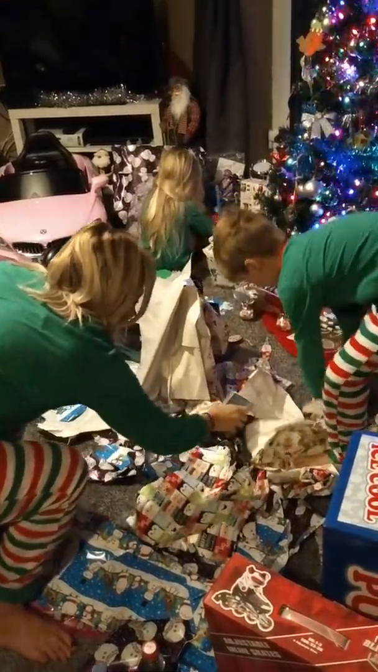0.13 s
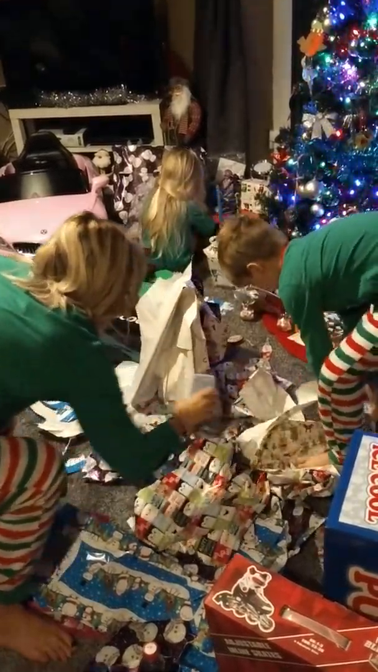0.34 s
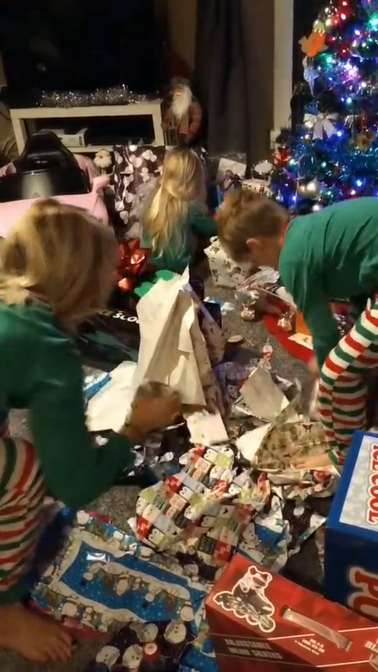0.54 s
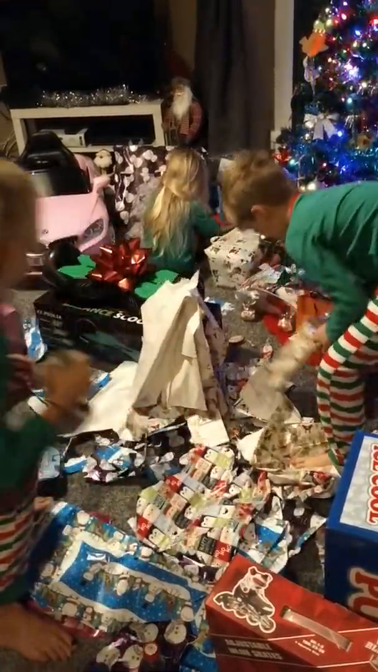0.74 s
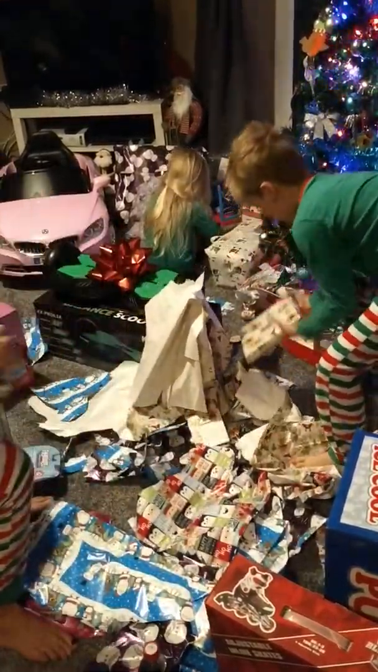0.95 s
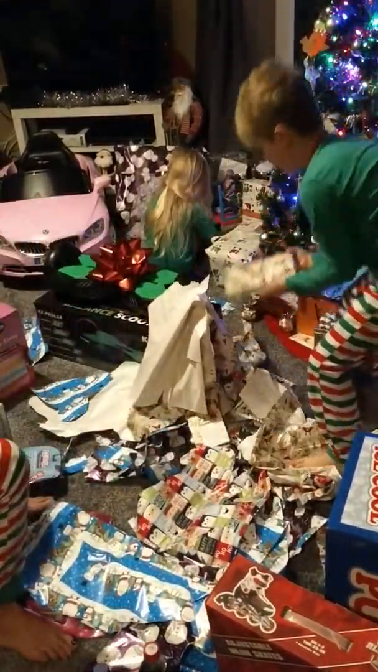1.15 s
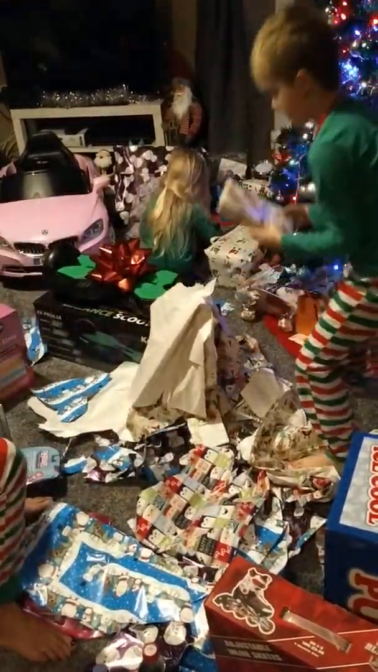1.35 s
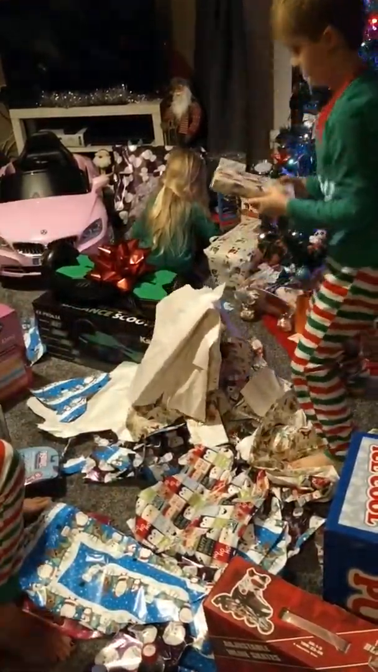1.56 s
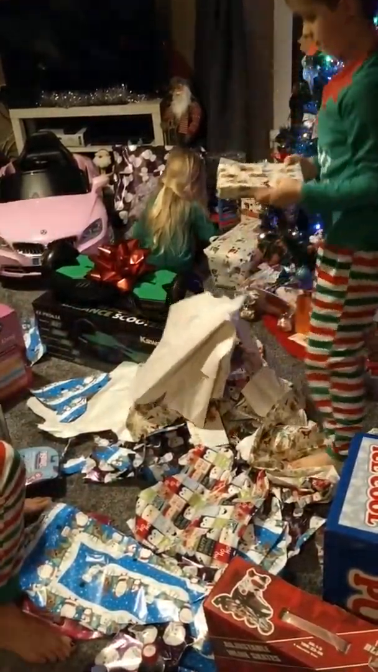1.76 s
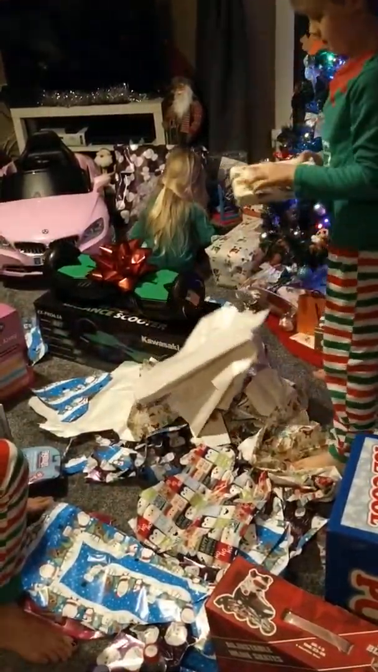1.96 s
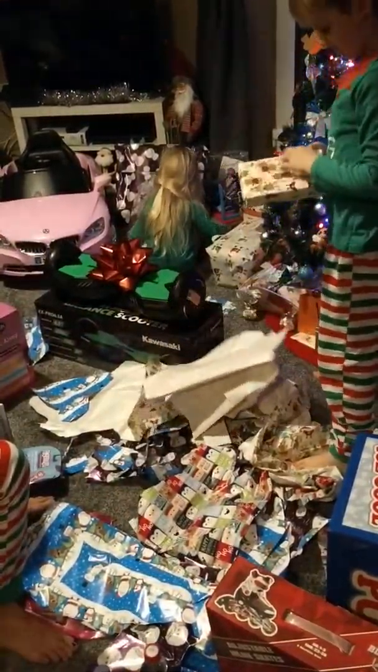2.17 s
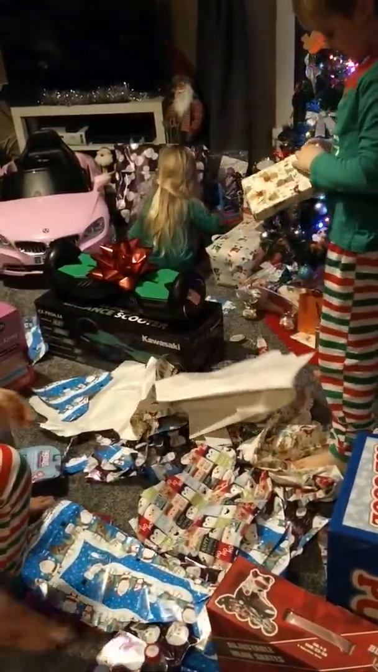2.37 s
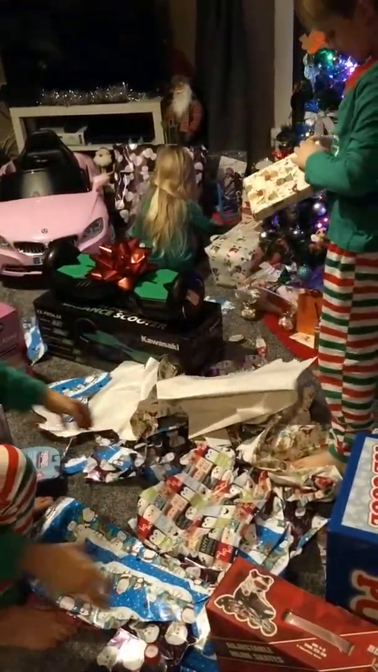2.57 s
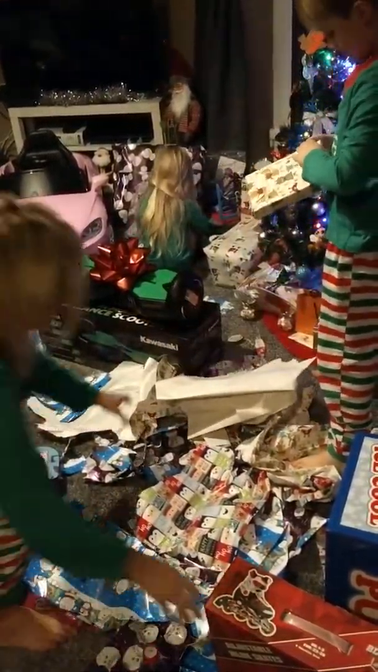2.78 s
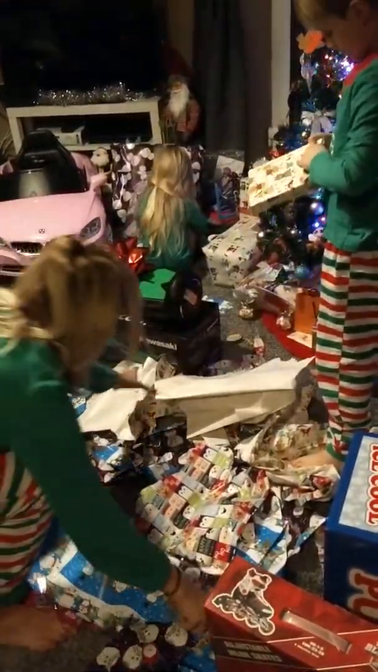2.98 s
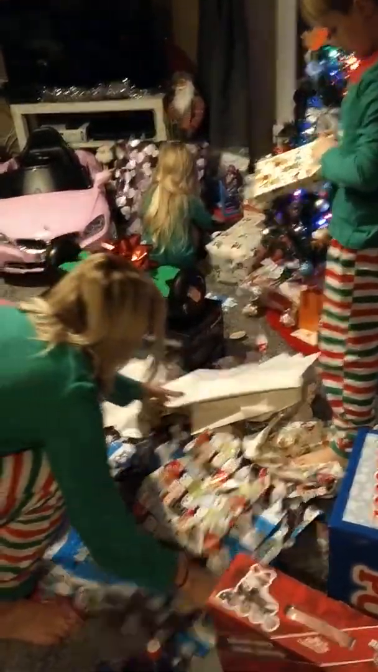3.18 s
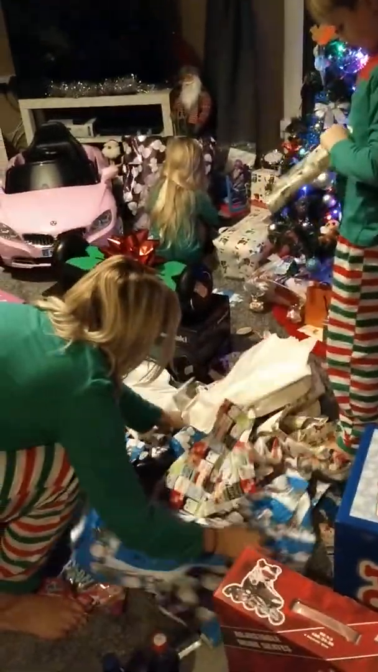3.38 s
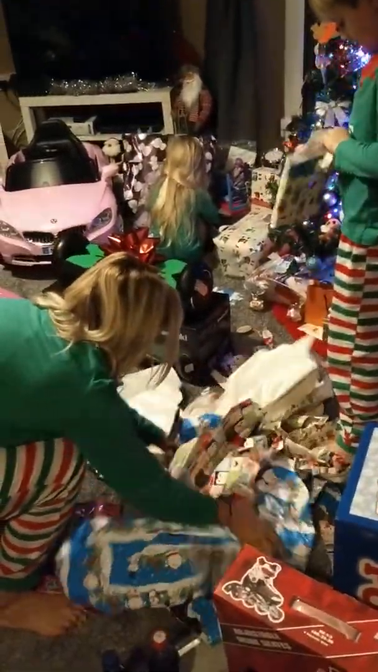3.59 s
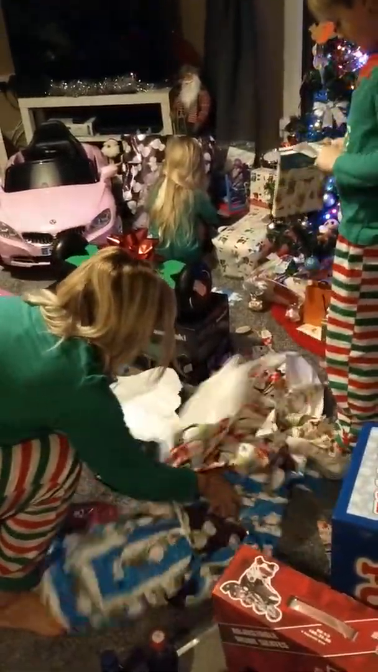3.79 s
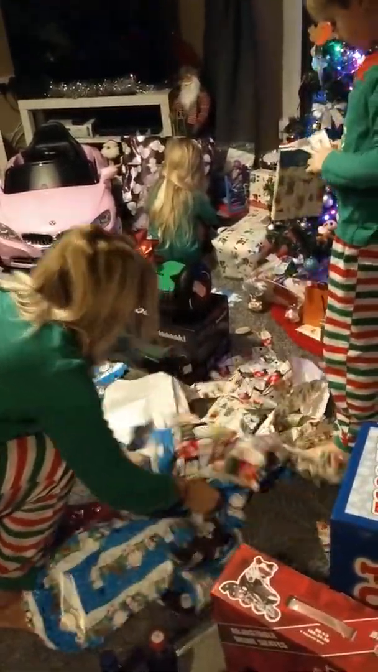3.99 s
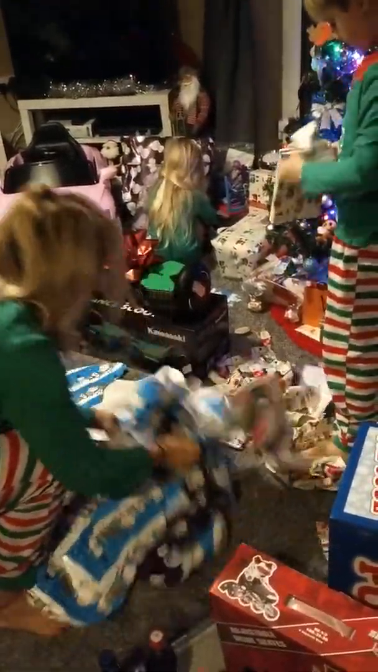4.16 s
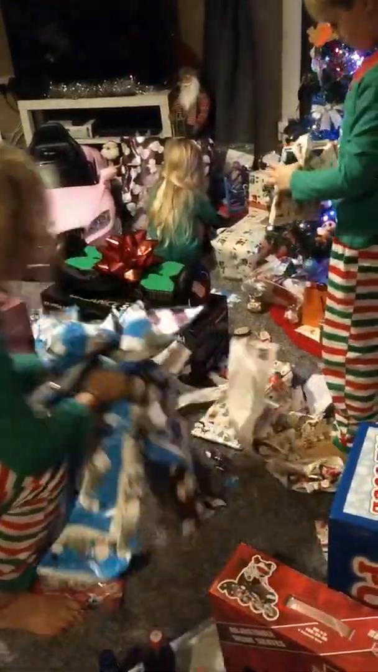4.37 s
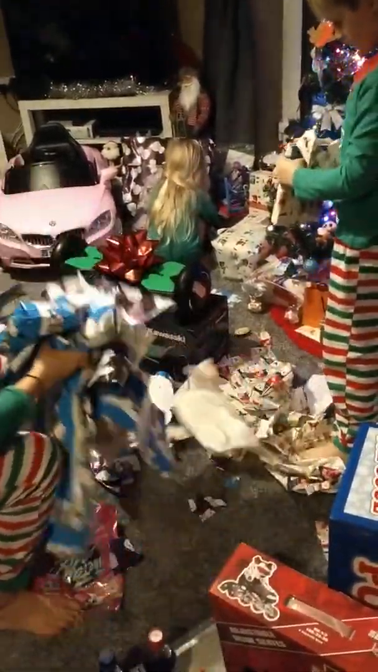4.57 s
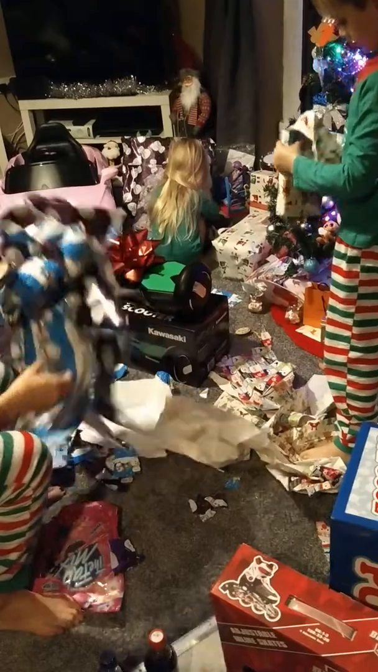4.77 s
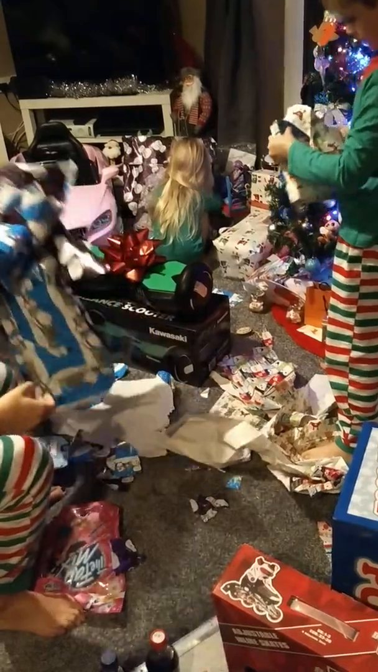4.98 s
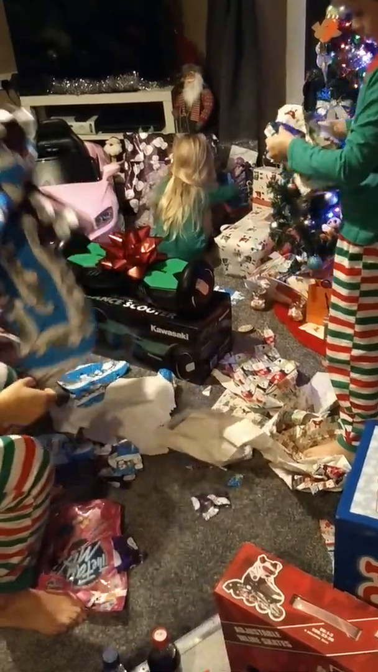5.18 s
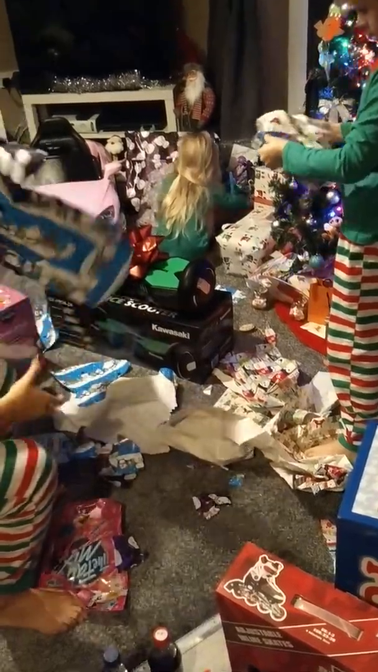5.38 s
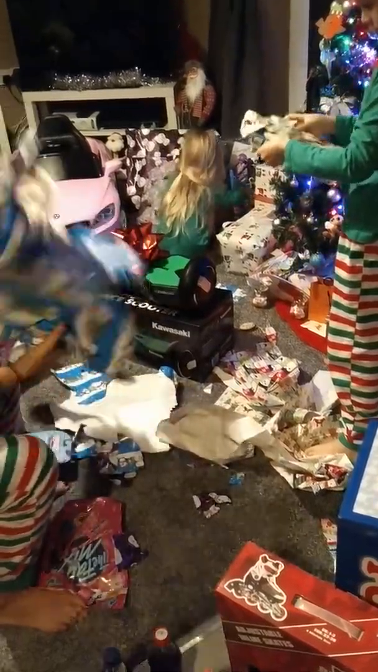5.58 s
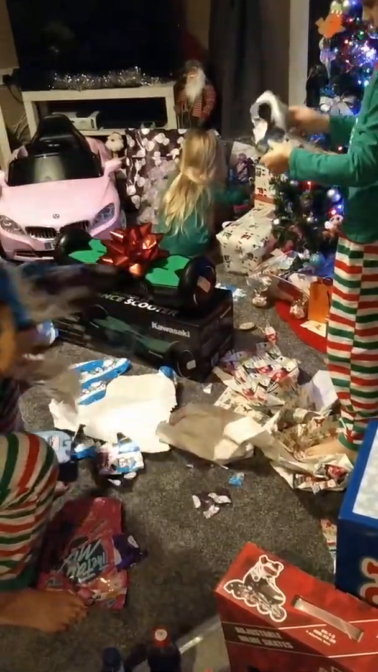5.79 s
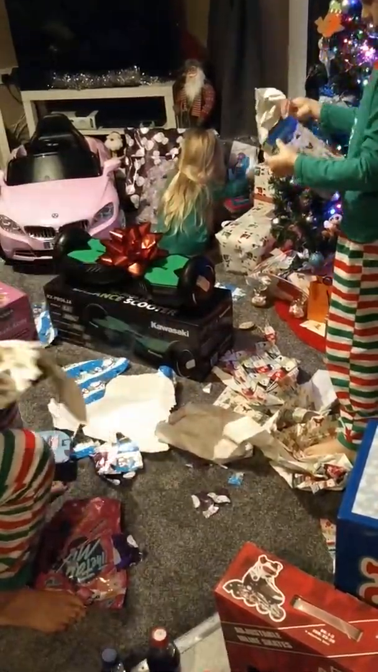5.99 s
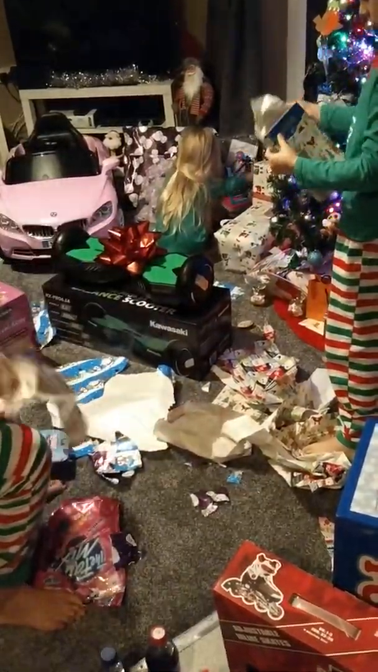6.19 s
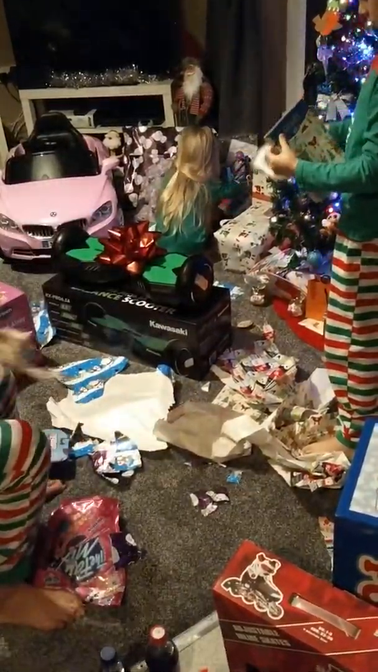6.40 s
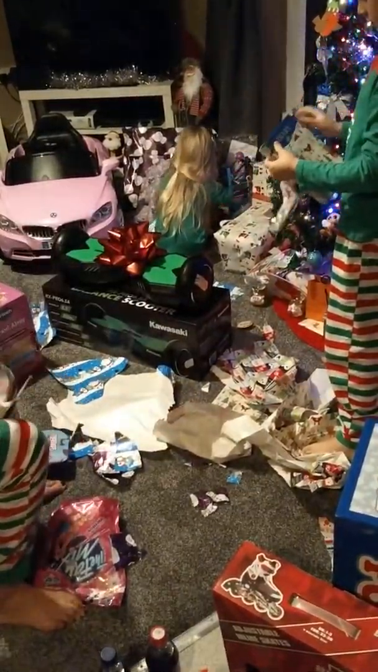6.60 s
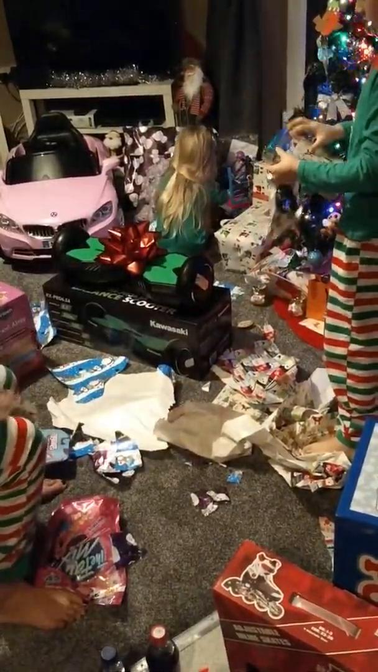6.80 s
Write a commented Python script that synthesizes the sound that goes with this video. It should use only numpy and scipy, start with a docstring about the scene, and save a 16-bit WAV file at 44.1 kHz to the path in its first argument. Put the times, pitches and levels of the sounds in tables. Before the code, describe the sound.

Quiet paper rustling and faint cardboard rubbing open the scene, followed by several dry rips, a boxy knock and a soft thud. After a near pause, heaps of stiff wrapping paper are gathered and crumpled vigorously, with sharp ticks, flapping sheets and further tears. Close phone pickup, short dry indoor ambience, faint low hum underneath.

```python
"""A carpeted living room, close to a phone: wrapping paper is gathered, crumpled and torn.
Countless creases buckle and fibres snap as random clicks, shaped in pitch and level by the hands.
Flapping sheets are low noise from the same clicks, stiff folds are short noise bursts, and rubbed cardboard
is slip impulses through a resonance; knocked boxes and the thudding floor ring in decaying modes.
A faint hum lies underneath; the phone widens its two microphones by cancelling each against the other."""
import sys
import numpy as np
from scipy import signal
from scipy.fft import rfft, irfft, next_fast_len
from scipy.io import wavfile
from scipy.ndimage import uniform_filter1d

SR = 44100
rng = np.random.default_rng(int(sys.argv[2]) if len(sys.argv) > 2 else 0)


def inscribe(sig):
    """Save sig as 16-bit PCM at rate SR to the path in sys.argv[1].

    A 1-D sig is mono; a 2-D sig holds one channel per row.
    Samples are clipped to [-1, 1] before scaling.
    """
    pcm = np.round(np.clip(np.atleast_2d(sig).T, -1, 1) * 32767)
    wavfile.write(sys.argv[1], SR, pcm.astype(np.int16))


N = 302040
TIME = np.arange(N) / SR
SIZE = next_fast_len(N + SR // 2)  # transform length, with space for the room's tail
FREQ = np.arange(SIZE // 2 + 1) * SR / SIZE + 1e-3  # Hz, kept off zero for the logarithms


def undb(db):
    """Decibels to gain."""
    return 10 ** (np.asarray(db) / 20)


def unit(x):
    """Scale to rms 1."""
    return x / np.sqrt(np.mean(np.abs(x) ** 2))


def colour(points):
    """Gain at every frequency, drawn through (Hz, dB) points on a logarithmic pitch axis."""
    hz, db = np.transpose(points)
    return undb(np.interp(np.log(FREQ), np.log(hz), db))


def lifts(modes):
    """Response of a few resonances standing on a flat spectrum."""
    return 1 + sum((undb(db) - 1) / (1 + 2j * (FREQ - hz) / width) for hz, width, db in modes)


def shape(x, response):
    """Filter by a frequency response."""
    return irfft(rfft(x, SIZE) * response, SIZE)[..., :N]


MIC_SPACING_S = .0004  # travel time between the two microphones


def diffuse(pair):
    """Spectra at two microphones of sound from all sides: alike in the bass, unrelated in the treble."""
    likeness = np.sinc(2 * FREQ * MIC_SPACING_S)
    mid, side = rfft(pair, SIZE) * np.sqrt([(1 + likeness) / 2, (1 - likeness) / 2])
    return np.array([mid + side, mid - side])


def room(wet_db, t60, treble_t60, lag=0):
    """Response of the room: direct sound, lag s later on the right, and a tail whose treble dies first."""
    t = np.arange(SR // 2) / SR
    echoes = rng.standard_normal((2, len(t))) * (t > .002)
    low = diffuse(echoes * undb(-60 * t / t60))
    high = diffuse(echoes * undb(-60 * t / treble_t60))
    bright = FREQ ** 2 / (FREQ ** 2 + 6000 ** 2)
    tail = unit(low * (1 - bright) + high * bright)
    direct = np.exp(1j * np.pi * lag * np.outer([1, -1], FREQ))
    return direct + undb(wet_db) * tail


# The still air's colour. Each row: frequency in Hz, relative density in dB.
AIR_COLOUR = [(30, 26.5), (55, 20), (90, 15), (160, 15.5), (320, 13), (480, 1), (800, 5.5), (2000, -2),
              (6000, -9), (15000, -9)]
# The steady hum's partials. Each row: frequency in Hz, rms level in dB ahead of the microphones.
HUM_PARTIALS = [(100, -60), (140, -54.5), (301, -59.5)]
STILL_AIR_DB = -49  # rms


def background():
    """Still air is coloured noise from all sides; the faint hum is a few sines, the same on both sides."""
    noise = diffuse(rng.standard_normal((2, N)))
    air = irfft(noise * colour(AIR_COLOUR), SIZE)[:, :N]
    hum = 0
    for hz, db in HUM_PARTIALS:
        hum = hum + undb(db) * unit(np.sin(2 * np.pi * (hz * TIME + rng.random())))
    return undb(STILL_AIR_DB) * unit(air) + hum


def strokes(events):
    """Power of body, crackle and sizzle: each stroke swells, holds while the hand moves, then dies away."""
    power = np.zeros((3, N))
    for start, swell, hold, t60, db, body_db, sizzle_db in events:
        during = slice(max(int(start * SR), 0), int((start + swell + hold + t60) * SR))
        t = TIME[during] - start
        dying = undb(-60 * np.clip((t - swell - hold) / t60, 0, 2))
        envelope = np.clip(t / swell, 0, 1) * dying
        power[:, during] += np.outer(undb([db + body_db, db, db + sizzle_db]), envelope) ** 2
    return power


# Handfuls grabbed and crushed. Each row: start in seconds, swell in seconds, hold in seconds,
# time to fall 60 dB in seconds, crackle level in dB, body and sizzle relative to it in dB.
GRAB_STROKES = [(0.0, 0.028, 0.015, 0.9, -51.5, 10, -23), (.24, 0.056, 0.034, 0.29, -36.5, 4, -11.5),
                (.465, 0.024, .046, 0.45, -41, 1.5, -7.5), (1.11, 0.04, 0.013, 0.1, -42, 8, -15),
                (2.56, .013, .023, 0.37, -44, 1, -18), (2.63, .016, 0.059, 0.3, -48.5, -10, -1),
                (2.755, 0.014, 0.031, 0.5, -52.5, 3.5, -16), (3.0, .013, 0.083, 0.2, -32.5, -6.5, -23),
                (3.055, 0.0071, 0.084, 0.34, -32, -3, -9.5), (3.26, 0.097, 0.14, 0.2, -30, -5.5, -11.5),
                (3.61, .14, 0.029, 0.4, -27, -1, -7.5), (3.84, 0.059, 0.12, 0, -35.5, 0, -22),
                (4.2, .04, 0.012, 0.6, -31, -3, -22), (4.275, 0.036, 0.022, 0.25, -27.5, -2.5, -11),
                (4.39, 0.035, 0.019, 0.22, -26, -5, -10), (4.8, .02, 0.025, 1.1, -37.5, -15, -8),
                (5.44, .026, 0.046, 0.2, -39.5, -2.5, -5), (5.615, 0.0074, 0.056, 0.46, -26, -8, -15.5),
                (5.69, 0.031, 0.049, 0.34, -26, -5, -12), (5.83, 0.099, 0.032, 0.5, -36, 3.5, -3),
                (6.02, .027, 0.082, 0.5, -46, 9.5, 1.5), (6.16, 0.021, 0.11, 0.3, -40, 6.5, -9),
                (6.31, 0.086, 0.035, 0.25, -29.5, -0.5, -10.5), (6.65, 0.083, 0.043, 0.5, -35.5, -1, -7.5)]


def grabs():
    """Power of the crushing: a hand closes on the paper, squeezes and lets it settle."""
    return strokes(GRAB_STROKES)


# The loose heap shifting on the carpet. Each row: time in seconds, crackle level in dB.
HEAP_LEVEL = [(0, -46), (.43, -48), (.56, -42.5), (1.1, -39), (1.65, -51.5), (2.0, -46), (2.3, -50.5),
              (2.75, -53.5), (3.2, -35.5), (3.9, -32), (4.75, -37.5), (4.93, -36.5), (5.25, -39),
              (5.39, -46.5), (5.6, -39.5), (5.85, -32.5), (6.5, -37), (6.85, -38.5)]
HEAP_BODY_DB, HEAP_SIZZLE_DB = -5, -12.5  # relative to its crackle


def heap():
    """Power of the heap's rustle, gliding in level from point to point with a fixed brightness."""
    level = undb(np.interp(TIME, *np.transpose(HEAP_LEVEL)))
    return np.outer(undb([HEAP_BODY_DB, 0, HEAP_SIZZLE_DB]), level) ** 2


# Whole sheets swung through the air. Each row: middle in seconds, length in seconds, flap level in dB.
SHEET_SWINGS = [(0.03, 0.11, -47.5), (1.025, 0.077, -45.5), (1.363, 0.55, -51.5), (4.26, 0.19, -45),
                (5.02, 0.14, -50), (5.455, 0.031, -48), (5.715, 0.16, -47), (6.39, 0.092, -40.5),
                (6.763, 0.12, -42)]
# air pushed by the paper: dB at the reference body level, then dB gained per dB of body
AIR_DB, AIR_SLOPE, BODY_REFERENCE_DB = -48.5, 0.68, -35


def flap(body_db):
    """Power of the flap: pushed air follows the paper's body, and each swing adds a smooth swell."""
    power = undb(AIR_DB + AIR_SLOPE * (body_db - BODY_REFERENCE_DB)) ** 2
    for middle, length, db in SHEET_SWINGS:
        power = power + undb(db) ** 2 * np.exp(-(2 * (TIME - middle) / length) ** 2)
    return power


# Rips through the paper. Each row: start in seconds, swell in seconds, hold in seconds,
# time to fall 60 dB in seconds, crackle level in dB, body and sizzle relative to it in dB,
# share from the side (0-1).
RIP_STROKES = [(0.829, 0.15, .019, 0.37, -31, -12, -8, 0.84), (.86, .02, .03, 1, -41, -12, -14, .95),
               (1.10, 0.07, 0.25, 0.5, -31, -12, -7.5, 0.89),
               (1.34, 0.099, 0.075, 0.33, -29.5, -9.5, -5.5, 0.86),
               (1.698, 0.022, 0.26, 0.33, -36.5, -7.5, -10, .7),
               (1.817, 0.073, 0.02, 0.24, -25.5, -4.5, -9, .5),
               (2.781, 0.013, 0.094, .02, -36.5, -17, -2, .8),
               (2.84, .055, .043, .31, -31, -10.5, -5, 0.76),
               (3.48, 0.035, 0.066, 0.34, -25.5, -9, -6.5, .5),
               (4.948, .058, 0.053, 0.36, -29, -25, -14.5, 0.74),
               (5.12, 0.037, 0.047, .29, -22.5, -10, -12, .1), (5.897, .03, .04, 0.5, -35, -10, -6, .9)]


def rips():
    """Power of the tearing, and the part of its crackle that comes from the present off to the side."""
    power, aside = 0, 0
    for *stroke, side_share in RIP_STROKES:
        rip = strokes([stroke])
        power = power + rip
        aside = aside + side_share * rip[1]
    return power, aside


RIP_FIBRES_DB, GRAB_FIBRES_DB = 4, -2  # fibres against creases, before the crowds' own trims


def handling():
    """Levels (dB) of flap, body, crackle and sizzle, fibres against creases (dB), and share from the side."""
    ripping, aside = rips()
    power = ripping + grabs() + heap()
    body, crackle, sizzle = 10 * np.log10(power)
    tearing = GRAB_FIBRES_DB + (RIP_FIBRES_DB - GRAB_FIBRES_DB) * ripping[1] / power[1]
    levels_db = np.array([10 * np.log10(flap(body)), body, crackle, sizzle])
    return levels_db, tearing, aside / power[1] + 1e-12


def creases(rate, spread_db, clump_db, share_db):
    """Sample, size and pitch of tiny bucklings per second; clumping swells their size in avalanches."""
    count = int(rate * N / SR)
    avalanche = unit(uniform_filter1d(rng.standard_normal(N), SR // 150))
    at = rng.integers(0, N, count)
    outlier = np.minimum(rng.exponential(size=count), 4)  # a few far louder than the rest
    size = undb(spread_db * outlier + clump_db * avalanche[at])
    size = unit(size) / np.sqrt(rate) * undb(share_db[at])
    pitch = 3000 * 2 ** (1.5 * rng.standard_normal(count))
    return at, size, pitch


SCATTER_S = .0005  # mean delay: each pitch of a buckling leaves the sheet at its own moment


def scattered(at, size):
    """A train of clicks, each a little late and of either sign."""
    late = (rng.exponential(SCATTER_S, len(at)) * SR).astype(int)
    return np.bincount(at + late, size * rng.choice([-1, 1], len(at)), N)[:N]


# Flap, body, crackle and sizzle, in that order. Each row: low edge in Hz, high edge in Hz.
PAPER_RANGES = [(150, 450), (700, 2000), (2400, 7000), (9400, 15500)]
# Colour of the paper. Each row: frequency in Hz, gain in dB.
PAPER_COLOUR = [(90, -13), (160, 0.5), (300, 0.5), (550, -1), (900, -3), (1300, -4.5), (2000, -2.5),
                (2550, -4.5), (3200, -2), (3900, -3), (5000, -3), (6000, -0.5), (9000, -1.64), (12000, 0),
                (15500, -2.5)]
# Standing waves of the room. Each row: frequency in Hz, width in Hz, lift in dB (negative dips).
ROOM_WAVES = [(179, 13, 5), (210, 11, 2), (292, 48, 4.5), (344, 37, 6.5), (482, 85, -5.5)]


def rustle(places, width_octaves=2.03, steady_s=0.085):
    """Creases and fibres each sound a broad range round their pitch; the hands set level and brightness."""
    levels_db, tearing, aside = handling()
    density_db = levels_db - 10 * np.log10(np.diff(PAPER_RANGES))
    log_centres = np.log(PAPER_RANGES).mean(axis=1)
    ahead_db, aside_db = 10 * np.log10([1 - aside, aside])
    # ahead: three places of sparse creases, three of dense fibres; the last place is off to the side
    crowds = [creases(rate=170, spread_db=2.2, clump_db=2.0, share_db=ahead_db - tearing / 2)
              for _ in range(3)]
    crowds += [creases(rate=1800, spread_db=3.2, clump_db=0.0, share_db=ahead_db + tearing / 2 - 1)
               for _ in range(3)]
    crowds += [creases(rate=3600, spread_db=3.0, clump_db=0.8, share_db=aside_db + 7)]
    paper = colour(PAPER_COLOUR) * lifts(ROOM_WAVES)
    out = 0
    for hz in 1000 * 2 ** (np.arange(-7, 9) / 2):  # overlapping half-octave steps
        band = np.cos(np.pi / 2 * np.clip(2 * np.log2(FREQ / hz), -1, 1))
        clicks = []
        for at, size, pitch in crowds:
            nearness = 1 / (1 + (np.log2(pitch / hz) / width_octaves) ** 2)
            clicks.append(scattered(at, size * nearness))
        clicks = np.array(clicks)
        # the hands feed in energy steadily, so a big snap relieves its neighbours
        energy = uniform_filter1d(np.sum(clicks ** 2, axis=0), int(steady_s * SR))
        clicks = clicks / np.sqrt(np.abs(energy) + 1e-15)
        heard = sum(rfft(train, SIZE) * walls for train, walls in zip(clicks, places))
        # crossfade between the levels of the two nearest ranges
        weights = np.array([np.interp(np.log(hz), log_centres, row) for row in np.eye(len(PAPER_RANGES))])
        out = out + irfft(heard * band * paper, SIZE)[:, :N] * undb(weights @ density_db)
    return out * np.sqrt(SR / 2)


# Hollow packages rubbed by hands and carpet. Each row: middle in seconds, length in seconds,
# level in dB ahead of the overall trim, resonance in Hz.
PACKAGE_RUBS = [(0.06, 0.062, -41.5, 738), (0.526, 0.074, -48, 867), (0.814, 0.09, -42, 296),
                (0.99, .12, -45.5, 334), (1.11, 0.16, -47, 819), (1.254, 0.12, -44.5, 198),
                (4.992, 0.32, -44, 333), (5.82, 0.16, -45, 175), (6.22, 0.34, -41.5, 588)]


def rubs(walls, slips_per_s=400, damping=.2, gain_db=-1):
    """Cardboard sticks and slips, and the hollow package hums at its own resonance."""
    out = 0
    for middle, length, db, hz in PACKAGE_RUBS:
        slips = rng.standard_normal(N) * (rng.random(N) < slips_per_s / SR)
        resonance = 1 / (1 + 2j * (FREQ - hz) / (damping * hz)) ** 2
        hollow = unit(shape(slips, resonance))
        out = out + undb(db + gain_db) * hollow * np.exp(-2 * ((TIME - middle) / length) ** 2)
    return shape(out, walls)


# Single creases that snap through. Each row: start in seconds, peak of the crack in dB ahead of the room,
# pitch in Hz, bright tick relative to the crack in dB.
CREASE_SNAPS = [(0.156, -29.5, 4500, -4), (0.468, -32, 1300, -8), (0.486, -25, 2360, -10),
                (0.736, -36, 3300, -10), (1.911, -17, 3500, -8), (2.447, -31, 2630, -7),
                (2.642, -39, 4500, -6), (2.689, -31, 5630, -10), (2.767, -37, 1660, -14),
                (2.783, -29, 4000, 5.5), (2.838, -20, 4470, 1), (3.004, -20, 2200, -10),
                (3.062, -21, 2200, -7), (3.0655, -22.5, 6000, 2), (3.3413, -24, 5000, -1.5),
                (3.496, -20, 3380, -12), (3.54, -15.5, 3600, -8), (3.757, -17.5, 1500, -12),
                (3.773, -22, 3400, -10), (3.839, -23, 3860, -3), (4.145, -22.5, 2940, -12),
                (4.2857, -24, 4000, -3), (4.2991, -21, 5000, -3), (4.31, -18, 1900, -12),
                (4.325, -18, 3400, -8), (4.334, -19, 3000, -8), (4.4246, -21, 5000, -4),
                (4.456, -17, 6500, 3), (4.8, -30, 1360, -14), (4.818, -26, 4000, -3),
                (5.003, -23, 5500, -3.5), (5.129, -20, 5500, -4), (5.152, -16, 3140, -4),
                (5.3272, -20.5, 3500, 2), (5.42, -34, 3390, -10), (5.474, -23, 5900, -7),
                (5.526, -25, 4000, -12), (5.577, -18.5, 3600, -6), (5.622, -14, 3860, -10),
                (5.658, -16, 3700, -12), (5.697, -14, 2200, -4), (5.73, -13.5, 3730, -6),
                (5.889, -20, 3700, -6), (5.925, -21, 5500, -4), (6.1913, -27, 5000, -4.5),
                (6.202, -20, 3300, -5), (6.247, -18, 3400, -7), (6.3225, -26, 1090, 2),
                (6.404, -18, 1300, -16), (6.44, -16.5, 1700, -8), (6.507, -19.5, 5000, -10),
                (6.662, -25, 3900, -8), (6.748, -23, 1600, -12)]
TICK_S, CRACK_S, SHIVER_T60_S = .0006, .0016, .04  # two time constants, then time to fall 60 dB


def snaps(walls, crack_db=8, width_octaves=0.9, tick_hz=12000):
    """A stiff fold gives way: a bright tick, a crack, then a short shiver of the sheet around it."""
    out = np.zeros(N + SR)
    t = np.arange(SR // 10) / SR
    hz = np.fft.rfftfreq(len(t), 1 / SR) + 1
    tick = np.exp(-t / TICK_S)
    crack = undb(-60 * t / SHIVER_T60_S) + undb(crack_db) * np.exp(-t / CRACK_S)
    for s, db, pitch, tick_db in CREASE_SNAPS:
        start = int(s * SR)
        for centre, envelope, peak_db in (pitch, crack, db), (tick_hz, tick, db + tick_db):
            tone = 1 / (1 + (np.log2(hz / centre) / width_octaves) ** 2)
            burst = irfft(rfft(rng.standard_normal(len(t))) * tone, len(t)) * envelope
            out[start:start + len(t)] += undb(peak_db) * burst / np.abs(burst).max()
    return shape(out, walls)


SPOT_DB, SPOT_OCTAVES = 6, 0.37  # lift of the modes near the struck spot's pitch, and its reach
SCUFF_DB = -8  # scuffing noise's starting level, against the modes' reference level
RADIATION_HZ = 116  # below this a struck body moves little air


def blows(events, modes, walls, gain_db, scuff_t60, scuff_hz):
    """Blows ring and scuff a body; each spot favours some modes, a longer contact leaves only low ones."""
    out = np.zeros(N + SR)
    t = np.arange(SR // 2) / SR
    rings = np.array([undb(db - 60 * t / t60) * np.cos(2 * np.pi * hz * t) for hz, db, t60 in modes])
    mode_hz = np.array(modes)[:, 0]
    surface = signal.butter(3, [160, scuff_hz], "band", fs=SR, output="sos")
    for s, db, contact, spot_hz in events:
        octaves_off = np.log2(mode_hz / spot_hz)
        ring = undb(SPOT_DB * np.exp(-(octaves_off / SPOT_OCTAVES) ** 2)) @ rings
        scuff = unit(signal.sosfilt(surface, rng.standard_normal(len(t))))
        scuff = scuff * undb(SCUFF_DB - 60 * t / scuff_t60)
        push = np.sin(np.pi * t[t < contact] / contact)
        blow = signal.fftconvolve(ring + scuff, push / push.sum())
        start = int(s * SR)
        out[start:start + len(blow)] += undb(db + gain_db) * blow
    radiation = signal.butter(3, RADIATION_HZ, "high", fs=SR, output="sos")
    return shape(signal.sosfilt(radiation, out), walls)


# Knocks on the box. Each row: start in seconds, level in dB ahead of the overall trim,
# contact time in seconds, pitch favoured by the struck spot in Hz.
BOX_KNOCKS = [(0.467, -47, 0.00053, 600), (1.685, -45, 0.0015, 480), (1.8455, -23.5, 0.0013, 200),
              (1.8515, -27, 0.0013, 490), (1.8565, -34, 0.0014, 200), (1.895, -35, 0.0014, 320),
              (1.909, -28.5, 0.0018, 290), (1.932, -39, 0.0016, 320)]
# Modes of the box. Each row: frequency in Hz, relative level in dB, time to fall 60 dB in seconds.
BOX_MODES = [(143, -2, 0.17), (175, 5, 0.22), (208, 0.5, 0.2), (267, -1, 0.35), (300, 1, 0.13),
             (337.5, -1.5, 0.27), (491, 10, 0.1), (534, 2.5, 0.13), (700, -1, 0.2), (800, 1.5, .2),
             (942, 2, .08)]


def knocks(walls):
    """A knocked cardboard box rings in its modes, with a scuff of its surface."""
    return blows(BOX_KNOCKS, BOX_MODES, walls, gain_db=-6.5, scuff_t60=0.34, scuff_hz=950)


# Weight coming down on the floor. Each row: start in seconds, level in dB ahead of the overall trim,
# contact time in seconds, pitch favoured by the struck spot in Hz.
FLOOR_THUDS = [(2.553, -46, 0.0013, 700), (2.5595, -34.5, 0.0011, 305), (2.5665, -28.5, 0.0016, 300),
               (2.578, -29, 0.002, 170), (2.592, -36, 0.0024, 165), (2.625, -42, 0.0014, 380),
               (5.195, -27.5, 0.0026, 200), (6.395, -36.5, 0.00064, 450)]
# Modes of the floor. Each row: frequency in Hz, relative level in dB, time to fall 60 dB in seconds.
FLOOR_MODES = [(125, -5, 0.22), (171.6, 0.5, 0.22), (244, -5.5, 0.26), (282.4, -3.5, 0.27),
               (301.3, -2, 0.25), (338, -3, 0.21), (385, -8, 0.38), (424, -13, .25), (526, -7, 0.24),
               (590, -8, .3), (655, -3.5, 0.17), (725, 4, 0.086), (815, 3.5, 0.16)]


def thuds(walls):
    """Weight lands on the floor, which rings in its modes under a longer, duller scuff."""
    return blows(FLOOR_THUDS, FLOOR_MODES, walls, gain_db=-1.5, scuff_t60=0.5, scuff_hz=690)


# how much later the right microphone hears the torn present, the box and the floor (s)
RIP_LAG_S, BOX_LAG_S, FLOOR_LAG_S = 0.000201, 0.00011, .00008


def scene():
    """Paper, box and floor in the same small room."""
    places = [unit(room(wet_db=3, t60=.22, treble_t60=.14)) for _ in range(6)]
    places += [unit(room(wet_db=0, t60=.22, treble_t60=.14, lag=RIP_LAG_S))]
    snap_walls = unit(room(wet_db=-3, t60=.25, treble_t60=.12))
    box_walls = room(wet_db=-14, t60=.33, treble_t60=.18, lag=BOX_LAG_S)
    floor_walls = room(wet_db=-14, t60=.33, treble_t60=.18, lag=FLOOR_LAG_S)
    paper = rustle(places) + snaps(snap_walls)
    struck = knocks(box_walls) + thuds(floor_walls)
    return background() + paper + rubs(floor_walls) + struck


# Shading of the right microphone by the phone. Each row: frequency in Hz, gain in dB.
RIGHT_SHADE = [(90, -.4), (180, .6), (450, 1.2), (700, -1), (1300, 0), (2000, 3.5), (2900, -1.5),
               (4500, -1.5), (6000, -0.5), (8000, -1.5), (12000, -2.5), (15000, -0.5)]
# Share of each microphone taken off the other. Each row: frequency in Hz, gain in dB.
CANCELLING = [(80, -9), (400, -4), (1100, -.6), (2350, -1.4), (3500, -2.2), (4700, -.6), (5800, -1.1),
              (7000, -4), (8100, -2.2), (9300, -1.8), (12000, -5.2), (15000, -4.6)]
# Lift of the difference between the channels. Each row: frequency in Hz, gain in dB.
SIDE_LIFT = [(120, 16.5), (200, 5), (320, 2), (600, 7), (1100, 1.5), (2300, 2.5), (4500, 2.5), (7000, 3),
             (13000, 2.5)]
CANCEL_LAG_S = 19 / SR
RECIRCULATION = 0.1  # share of the cancelled sound fed round again, which narrows the notches
OUTPUT_DB = 0.39
BOTTOM_HZ, TOP_HZ = 91, 15500


def record(dry):
    """Each channel has the other taken off it a moment later, over and over; bass and top are cut steeply."""
    left = rfft(dry[0], SIZE)
    right = rfft(dry[1], SIZE) * colour(RIGHT_SHADE)
    late = np.exp(-2j * np.pi * FREQ * CANCEL_LAG_S)
    cross = colour(CANCELLING) * late
    again = RECIRCULATION * late
    mid = (left + right) / 2 * (1 - cross) / (1 - again)
    side = (left - right) / 2 * (1 + cross) / (1 + again) * colour(SIDE_LIFT)
    wide = undb(OUTPUT_DB) * irfft(np.array([mid + side, mid - side]), SIZE)[:, :N]
    bass_cut = signal.butter(4, BOTTOM_HZ, "high", fs=SR, output="sos")
    top_cut = signal.ellip(10, .2, 80, TOP_HZ, fs=SR, output="sos")
    return signal.sosfilt(top_cut, signal.sosfilt(bass_cut, wide))


dry = scene()
out = record(dry)
inscribe(out)
```